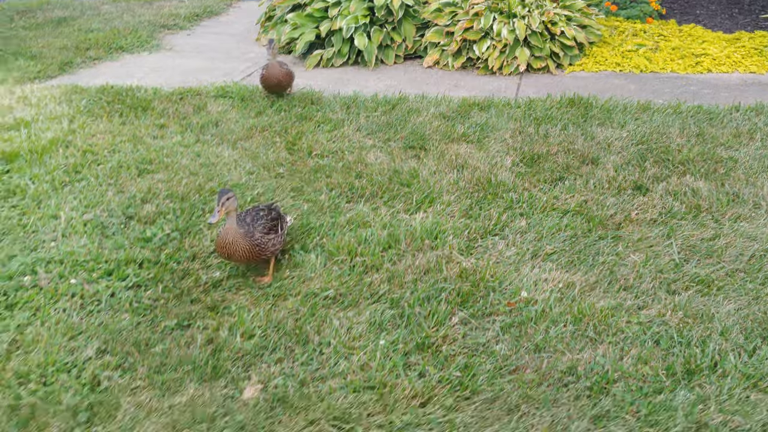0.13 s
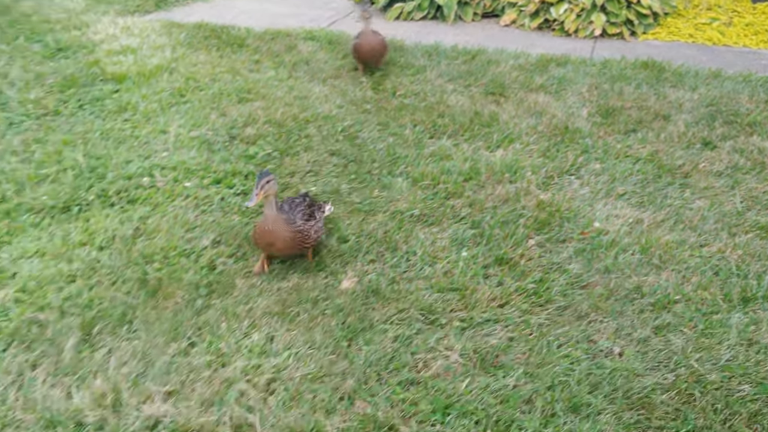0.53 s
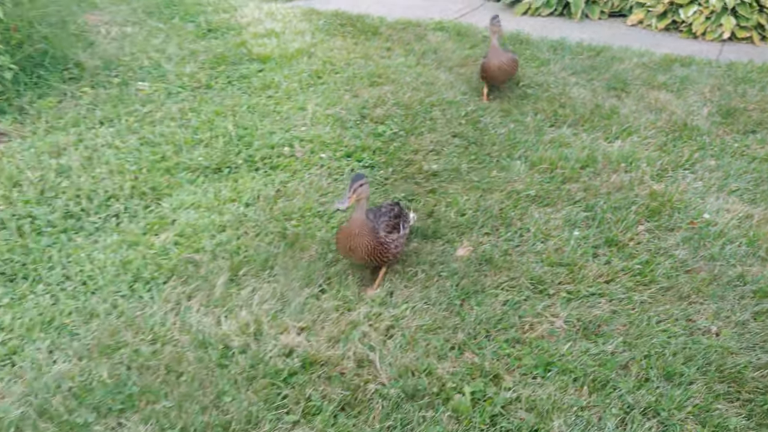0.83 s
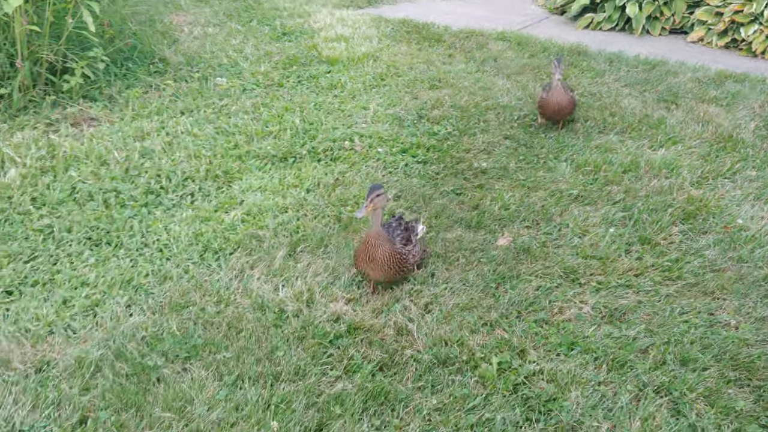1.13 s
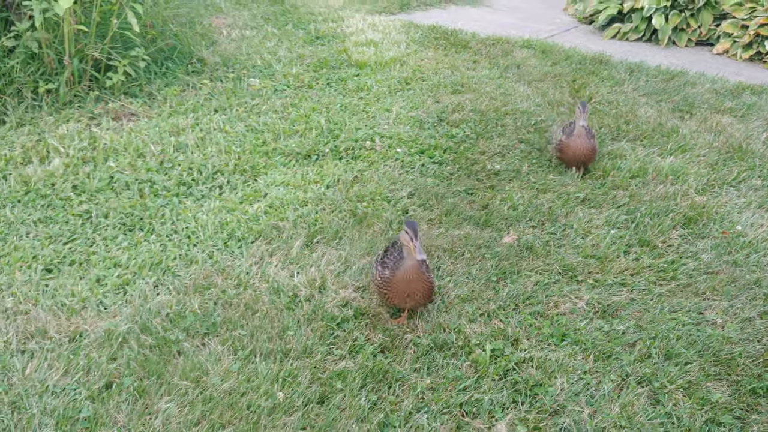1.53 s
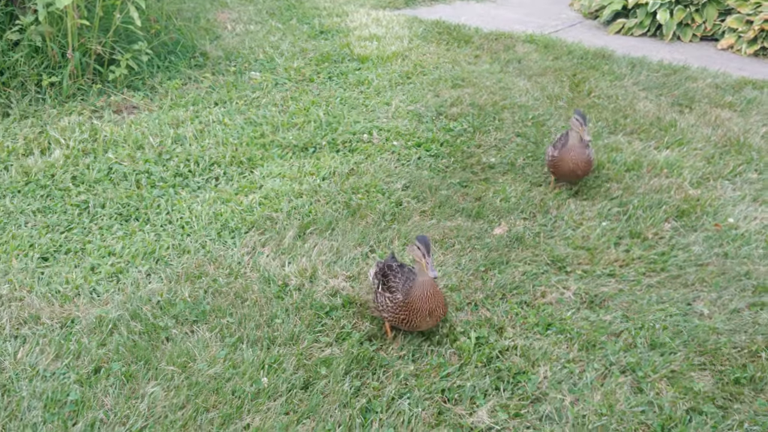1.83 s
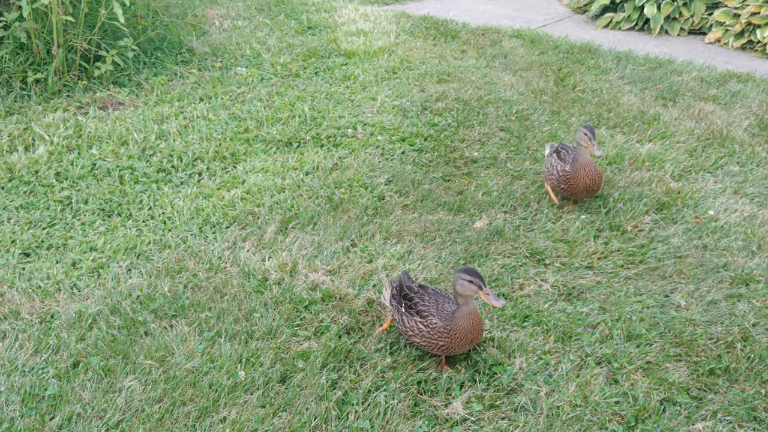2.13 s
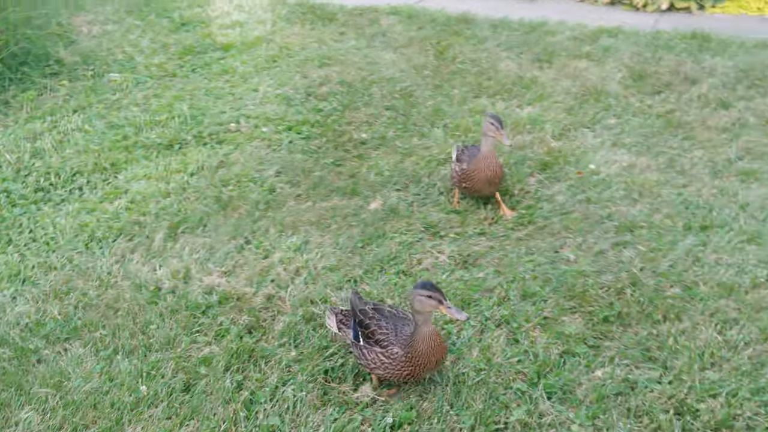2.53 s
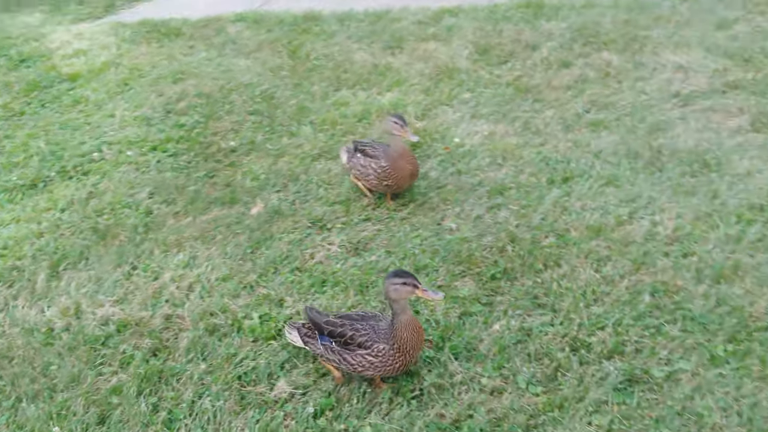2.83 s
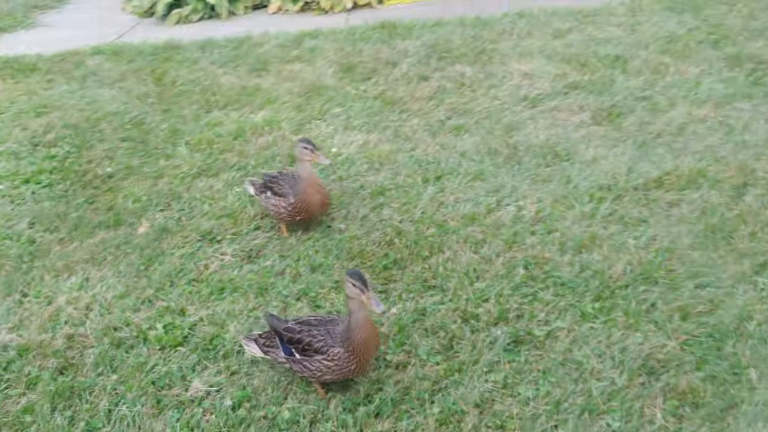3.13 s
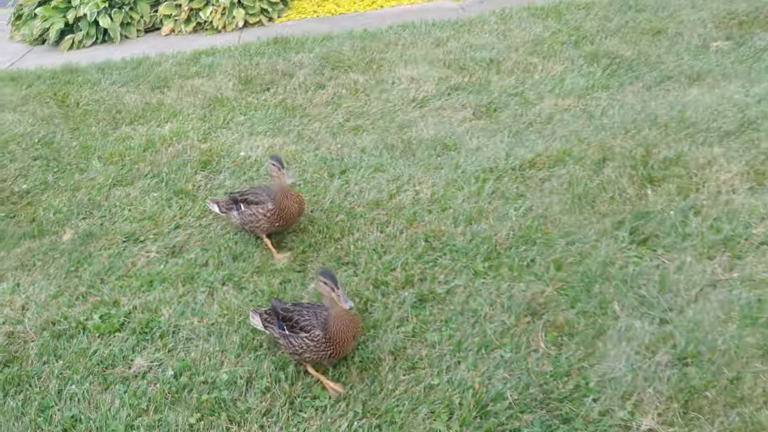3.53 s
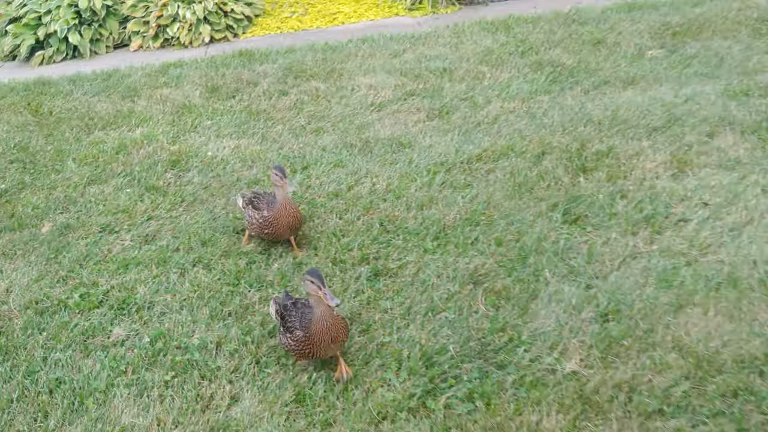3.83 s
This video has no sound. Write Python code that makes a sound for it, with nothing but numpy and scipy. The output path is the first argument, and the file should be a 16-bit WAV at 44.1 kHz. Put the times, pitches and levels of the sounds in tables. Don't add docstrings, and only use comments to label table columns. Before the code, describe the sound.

A duck on a lawn gives five soft nasal quacks in the second half, over a cooling unit's steady hiss and low hum, with faint grass steps and wind bumps on a hand-held phone.

```python
import sys
import numpy as np
from scipy import signal
from scipy.fft import rfft, irfft
from scipy.io import wavfile
from scipy.ndimage import uniform_filter1d

SR = 44100
rng = np.random.default_rng(int(sys.argv[2]) if len(sys.argv) > 2 else 0)


def output_pcm(signal):
    pcm = np.clip(np.atleast_2d(signal).T, -1, 1) * 32767
    wavfile.write(sys.argv[1], SR, np.round(pcm).astype(np.int16))


def voltage_ratio(level):
    return 10 ** (np.asarray(level, float) / 20)


N = 176400


def read(points, hz, axis=1):
    rows = np.transpose(points)
    return np.interp(np.log(hz + 1), np.log(rows[0] + 1), rows[axis])


def over_time(points, t):
    return np.interp(t, *np.transpose(points))


def evened(x):
    return x / np.sqrt(np.mean(x ** 2) + 1e-20)


def add(mix, s, sound):
    part = mix[..., round(s * SR):][..., :sound.shape[-1]]
    part += sound[..., :part.shape[-1]]


def resonate(x, hz, width_hz):
    turn = np.exp(2j * np.pi * np.cumsum(hz * np.ones(x.shape[-1])) / SR)
    r = np.exp(-np.pi * width_hz / SR)
    return 2 * (turn * signal.lfilter([1 - r], [1, -r], x / turn)).real


def resonate_twice(x, hz, width_hz):
    return resonate(resonate(x, hz, width_hz), hz, width_hz)


def air(size, field, patchy_db):
    hz = np.fft.rfftfreq(size, 1 / SR)[:, None]
    t = np.arange(4 * N // size + 5) * size / 4 / SR
    a, b, c, d, patches = rng.standard_normal((len(t), len(hz), 5)).T
    patches = uniform_filter1d(uniform_filter1d(patches, size=8, axis=0), size=12, axis=1)
    db, same, lag_s = field(hz, t)
    same = np.clip(same, 0, 1)
    left = a + 1j * b
    shared = same * left * np.exp(-2j * np.pi * hz * lag_s)
    z = np.array([left, shared + np.sqrt(1 - same ** 2) * (c + 1j * d)])
    z = z * voltage_ratio(db + patchy_db * evened(patches)) * np.sqrt(SR / size / 2)
    return signal.istft(z, nperseg=size, noverlap=size * 3 // 4)[1][:, :N]


# pitch_hz, level_db_per_hz
LEFT_AIR = [(600, -103), (1300, -74), (1800, -84), (2500, -79.5), (2900, -76.5), (3200, -81), (4300, -78),
            (4700, -81),
            (5300, -77), (6200, -82), (8300, -102), (9800, -93.5), (10600, -100), (11800, -94.5),
             (13200, -118), (16000, -130)]
RIGHT_AIR = [(600, -79), (1300, -74), (2000, -63), (2900, -68.5), (3200, -71), (4300, -77.5), (5500, -72.5),
             (6200, -73.5),
             (7050, -69), (8000, -91.5), (9200, -101), (9900, -101), (11600, -100), (12500, -103),
              (14500, -110), (15700, -114)]
# pitch_hz, left_db, right_db
TURNED = [(3060, 2.5, 0.5), (4300, 2.5, 4), (5450, 5, -7.5), (6130, 2.5, -14.5), (7130, 2.5, -5.5),
          (8600, 1, 3.5)]
# pitch_hz, same_share
FAN_SAME = [(1000, 0.95), (2800, 0.66), (4200, 0.24), (5000, 1), (6600, 0.46), (7200, 0.65), (8200, 0.12)]
# time_s, turned_share
TURN = [(0.3, 0.25), (1.5, 0), (2.6, 0.12), (3.0, 0.56), (4, 0.97)]
LAG_S, TURNED_LAG_S, TURNED_SAME = 0.0004205, 0.00015, 0.7
GATE_HZ = 8300
SHADE_DB, SHADE_HZ, SHADE_S = -5, 3630, 1.3


def fan(hz, t):
    turn = over_time(TURN, t)
    left_db = read(LEFT_AIR, hz) + turn * read(TURNED, hz)
    right_db = read(RIGHT_AIR, hz) + turn * read(TURNED, hz, axis=2)
    same = read(FAN_SAME, hz) * (1 - turn * (1 - TURNED_SAME))
    shaded = (hz > SHADE_HZ) * (hz < GATE_HZ)
    shade_db = SHADE_DB * shaded * np.clip(1 - t / SHADE_S, 0, 1)
    return np.array([left_db, right_db]) + shade_db, same, LAG_S + turn * (TURNED_LAG_S - LAG_S)


# pitch_hz, level_db_per_hz
TRAFFIC = [(15, -49.5), (28, -77), (55, -52.5), (110, -63), (220, -70.5), (400, -76.5), (850, -70.5),
           (1500, -78)]
# pitch_hz, same_share
TRAFFIC_SAME = [(60, 0.66), (140, 0.57), (330, 1), (700, 0.62), (1300, 0.15)]
# time_s, above_rumble_db
TRAFFIC_SWELL = [(0, 0.2), (2, 1.4), (2.6, 2.5), (3.2, 4), (4, 4)]


def traffic(hz, t):
    swell_db = over_time(TRAFFIC_SWELL, t) * np.clip(hz / 400, 0, 1)
    db = read(TRAFFIC + [(4000, -120)], hz) + swell_db
    return np.array([db + 1.3, db - .9]), read(TRAFFIC_SAME, hz), 0


# pitch_hz, level_db, waver_width_hz, steady_share
HUM = [(54.3, -44, 3.6, 0.94), (81, -54, 1.4, 0.39), (100.37, -34, 14, 0.85), (135, -44, 9.3, 0.79),
       (161, -49, 3.3, 0.38), (197.6, -49.5, 5.2, 0.38)]
# time_s, level_db
LOAD = [(.3, -2.5), (.85, -6.5), (1.1, -0.5), (1.65, 1), (1.85, -1), (2.3, 2), (2.8, -2.5), (3.25, 1.5),
        (3.6, 0), (4, -5)]


def hum():
    t, out = np.arange(N) / SR, 0
    for hz, db, width_hz, share in HUM:
        fuzz = evened(resonate_twice(rng.standard_normal(N), hz, 2 * width_hz))
        steady = np.sqrt(2 * share) * np.sin(2 * np.pi * hz * t)
        out = out + voltage_ratio(db) * (steady + np.sqrt(1 - share) * fuzz)
    return out * voltage_ratio(over_time(LOAD, t)) * voltage_ratio([[.6], [-.6]])


# time_s, level_db
RATTLE = [(0, -57), (.45, -54), (.66, -53), (.73, -49), (.86, -51), (1.1, -57), (2.0, -57), (2.3, -53),
          (2.8, -59)]
# pitch_hz, width_hz, level_db
CASING = [(1865, 9.2, -52), (2057, 73, -53.5), (2339, 13, -52.5), (2853, 15, -51), (2953, 22, -59)]
SHAFT_HZ, WEAK_BLADE_DB, FIRST_TICK_S, TICK_S = 26.7, -10, .704, .004
GRILLE_HZ, GRILLE_WIDTH_HZ, TICK_CLEAN, TICK_DROOP_HZ = 5330, 500, .6, 450
WHISTLE_LEFT_DB = -11


def grille():
    t = np.arange(N) / SR
    blade = 3 * SHAFT_HZ * (t - FIRST_TICK_S)
    weak = np.floor(blade) % 3 > 0
    strike = np.exp(-(blade % 1) / (3 * SHAFT_HZ * TICK_S)) * voltage_ratio(WEAK_BLADE_DB * weak)
    turns = np.cumsum(GRILLE_HZ + TICK_DROOP_HZ * (.5 - blade % 1)) / SR
    ticks = strike * (TICK_CLEAN * np.sin(2 * np.pi * turns) + 2 * rng.standard_normal(N))
    ticks = resonate_twice(ticks, GRILLE_HZ, GRILLE_WIDTH_HZ)
    ticks = voltage_ratio(over_time(RATTLE, t)) * evened(ticks)
    breath = rng.standard_normal(N)
    whistles = sum(voltage_ratio(db) * evened(resonate(breath, hz, width_hz)) for hz, width_hz, db in CASING)
    late_ticks, late_whistles = np.roll(np.array([ticks, whistles]), round(LAG_S * SR), axis=1)
    return np.array([ticks + voltage_ratio(WHISTLE_LEFT_DB) * whistles, voltage_ratio(-7.0) * late_ticks + late_whistles])


# centre_s, length_s, level_db, left_over_right_db
STEPS = [(0.596, 0.077, -64.5, -5), (0.908, 0.22, -72, 6), (1.498, 0.85, -64.5, -7),
         (1.674, 0.23, -62.5, -10), (2.54, 0.1, -70, 15), (2.62, 0.04, -63.5, 6), (2.77, 0.054, -71, 7),
         (2.991, 0.088, -60.5, -4), (3.283, 0.31, -67.5, -13.5), (3.464, .12, -66.5, -17),
         (3.635, 0.13, -67, -9), (3.89, 0.16, -67.5, -15), (4, 0.2, -68.5, -16)]
# pitch_hz, left_db, right_db
BLADES = [(3000, -14, -1), (6370, -4, 14), (7170, 0, 21), (8730, 1.5, -3.5), (9550, -6, -6),
          (11200, 4.5, -1), (13100, -12, -6), (15700, -24, -14)]
BLADES_PER_S, BLADE_SPREAD_DB = 5000, 2


def steps():
    t, swell = np.arange(N) / SR, 0
    for s, length_s, db, pan_db in STEPS:
        port_power = voltage_ratio([[db + pan_db / 2], [db - pan_db / 2]]) ** 2
        swell = swell + port_power * np.exp(-8 * ((t - s) / length_s) ** 2)
    clicks = rng.standard_normal((2, N)) * voltage_ratio(BLADE_SPREAD_DB * rng.exponential(1, (2, N)))
    clicks = clicks * (rng.random((2, N)) < BLADES_PER_S / SR)
    hz = np.fft.rfftfreq(N, 1 / SR)
    points = [(1500, -50, -50)] + BLADES
    colour = voltage_ratio([read(points, hz), read(points, hz, axis=2)])
    return voltage_ratio(10.5) * np.sqrt(swell) * evened(irfft(rfft(clicks) * colour, N))


# centre_s, length_s, level_db, pitch_hz
PUFFS = [
    (0.652, 0.055, -24.5, 54.3),
    (0.965, 0.042, -34, 80.6),
    (1.027, 0.068, -33, 45),
    (1.173, 0.19, -34, 63.6),
    (2.367, 0.064, -33, 58.6),
    (3.461, 0.046, -35, 49.6),
    (3.645, 0.037, -21.5, 63),
    (3.763, 0.097, -26, 51.4),
    (3.904, 0.12, -28.5, 45),
]
# centre_s, level_db, pitch_hz, length_s
SUCKS = [
    (.9208, -16, 95, .007),
    (.9445, -18, 60, .010),
    (1.008, -15.5, 100, .003),
]
THUMP_S, THUMP_DB, THUMP_HZ, THUMP_TOP_HZ = .9955, -7.5, 88, 134
THUMP_RISE_S, THUMP_FALL_S = 0.011, 0.0024


def wind():
    t, out = np.arange(N) / SR, np.zeros(N)
    u = t[:SR // 2] - 1 / 4
    for (s, length_s, db, hz), gust in zip(PUFFS, rng.standard_normal((len(PUFFS), len(u)))):
        puff = np.exp(-4 * (u / length_s) ** 2) * evened(resonate_twice(gust, hz, hz))
        add(out, s - 1 / 4, voltage_ratio(db) * puff)
    for s, db, hz, length_s in SUCKS:
        out = out - voltage_ratio(db) * np.exp(-((t - s) / length_s) ** 2) * np.cos(2 * np.pi * hz * (t - s))
    u = t - THUMP_S
    shape = np.exp(-(u / np.where(u < 0, THUMP_RISE_S, THUMP_FALL_S)) ** 2)
    hz = THUMP_HZ + (THUMP_TOP_HZ - THUMP_HZ) * np.exp(-abs(u) / 0.0027)
    thump = voltage_ratio(THUMP_DB) * shape * np.cos(2 * np.pi * hz * u)
    return (out + thump) * voltage_ratio([[0], [-20]])


# pitch_hz, width_hz, against_mouth_db
THROAT = [
    (265, 200, -8),
    (640, 450, -6),
]
SHUT_HZ, OPEN_HZ, SNAP_S, GAPE_S = 342, 255, .002, .0025
RISE_S, FALL_S, SAG_DB, SHUT_FADE_DB, LEAK_DB = .004, .02, -4, -3, -9
NASAL_HZ, NASAL_WIDTH_HZ, RASP_HZ, RASP_WIDTH_HZ = 1010, 330, 2600, 1500
JITTER, ROUGH = .01, .15


def quack(start, length, shut, shut_db, open_db, rasp_db, mouth_hz, mouth_width_hz, droop):
    t = np.arange(0, length + .02, 1 / SR)
    dropped = 1 / (1 + np.exp((shut - t) / SNAP_S))
    opened = 1 / (1 + np.exp((shut - t) / GAPE_S))
    wobble, breath = rng.standard_normal((2, 5000))[:, :len(t)]
    shut_hz = SHUT_HZ * (1 - droop * np.minimum(t / shut, 1))
    hz = shut_hz + (OPEN_HZ - shut_hz) * dropped
    hz = hz * (1 + JITTER * evened(uniform_filter1d(wobble, size=300)))
    turns = np.cumsum(hz) / SR
    folds = evened(sum(np.cos(2 * np.pi * k * turns) for k in range(1, 24)))
    drive = folds + ROUGH * breath * np.exp(-2 * (turns % 1))

    mouth_now_hz = NASAL_HZ + (mouth_hz - NASAL_HZ) * opened
    nasal = resonate_twice(drive, NASAL_HZ, NASAL_WIDTH_HZ)
    nasal = evened(resonate(nasal, NASAL_HZ, NASAL_WIDTH_HZ))
    mouth = resonate_twice(drive, mouth_now_hz, mouth_width_hz)
    mouth = evened(resonate(mouth, mouth_now_hz, mouth_width_hz))
    cavities = THROAT + [(RASP_HZ, RASP_WIDTH_HZ, rasp_db)]
    throat = sum(voltage_ratio(db) * evened(resonate_twice(drive, f, w)) for f, w, db in cavities)
    leak = evened(resonate_twice(drive, mouth_hz, mouth_width_hz))

    shape = np.clip(t / RISE_S, 0, 1) / (1 + np.exp((t - length) / FALL_S * 4 + 2))
    sag = voltage_ratio(SAG_DB * ((t - shut) / (length - shut)) ** 2)
    shut_gain = voltage_ratio(shut_db + SHUT_FADE_DB * (np.minimum(t / shut, 2) ** 2 - .5))
    shut_sound = shut_gain * (1 - opened) * (nasal + voltage_ratio(LEAK_DB) * leak)
    open_sound = voltage_ratio(open_db) * opened * sag * (mouth - throat)
    return shape * (shut_sound + open_sound)


# start_s, length_s, bill_shut_s
QUACKS = [
    (2.423, .052, .018),
    (2.646, .058, .015),
    (2.876, .060, .020),
    (3.114, .053, .018),
    (3.350, .060, .024),
]
# shut_db, open_db, rasp_db
EFFORT = [
    (-35.5, -36, -11),
    (-36.5, -34, -13),
    (-35.5, -37.5, -24),
    (-36, -37.5, -16),
    (-34, -38, -11),
]
# mouth_hz, mouth_width_hz, pitch_sag_share
BILLS = [
    (1450, 850, .06),
    (1430, 620, .1),
    (1300, 700, .08),
    (1400, 850, .1),
    (1800, 600, .05),
]
# start_s, level_db, pitch_hz, t60_s
CLACKS = [
    (2.7305, -25.5, 440, .026),
    (2.7305, -28, 790, .026),
    (2.755, -31, 420, .028),
    (3.190, -33, 1080, .05),
]
CLACK_RISE_S = .002


def duck():
    out, t = np.zeros(N), np.arange(3000) / SR
    for row, effort, bill in zip(QUACKS, EFFORT, BILLS):
        add(out, row[0], quack(*row, *effort, *bill))
    for s, db, hz, t60_s in CLACKS:
        ring = voltage_ratio(db - 60 * t / t60_s) * np.sin(2 * np.pi * hz * t)
        add(out, s, np.minimum(t / CLACK_RISE_S, 1) * ring)
    return np.array([out, voltage_ratio(0.4) * out + voltage_ratio(-21.0) * resonate(out, 2100, 900)])


def scene():
    unit = air(size=1024, field=fan, patchy_db=1.09) + hum() + grille()
    road = air(size=4096, field=traffic, patchy_db=1.5)
    return unit + road + steps() + wind() + duck()


# pitch_hz, level_db_per_hz
GATE = [(8300, -103), (9500, -102), (10000, -106), (12000, -107), (15700, -110)]
GATE_BIN_DB, GATE_CHANCE_DB = 0, 5


def gate(x):
    hz, _, z = signal.stft(x, SR, window="cosine", nperseg=2048, noverlap=1024)
    hz = hz[:1024, None]
    power = abs(z[:, :1024]) ** 2 * 2048 / SR
    bands = power.reshape(2, 32, 32, -1).mean(2)
    chance = voltage_ratio(2 * GATE_CHANCE_DB * rng.standard_normal(bands.shape))
    bands = np.repeat(bands * chance, 32, axis=1)
    least = voltage_ratio(2 * read(GATE, hz))
    strong = (bands > least) & (power > least * voltage_ratio(2 * GATE_BIN_DB))
    keep = np.pad(strong | (hz < GATE_HZ), ((0, 0), (0, 1), (0, 0)))
    return signal.istft(z * keep, SR, window="cosine", nperseg=2048, noverlap=1024)[1][:, :N]


# time_s, gain
FADE = [(0.076, 0.0018), (.12, 0.15), (.3, 0.53), (.6, 0.77), (1.1, 0.95), (1.5, 1)]
BASS_ON_S, BASS_CUT_HZ, BASS_CUT = 0.23, 143, 0.83


def top_cut(x):
    return signal.sosfilt(signal.butter(12, 15620, fs=SR, output="sos"), x)


def record(dry):
    t = np.arange(N) / SR
    bass = signal.sosfiltfilt(signal.butter(2, BASS_CUT_HZ, fs=SR, output="sos"), dry)
    held = dry - BASS_CUT * bass * np.clip((BASS_ON_S - t) / 0.007, 0, 1)
    fade = np.interp(t, *np.transpose(FADE), left=0)
    return top_cut(gate(held) * fade)


dry = scene()
out = record(dry)
output_pcm(out)
```